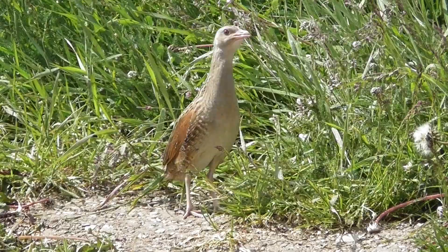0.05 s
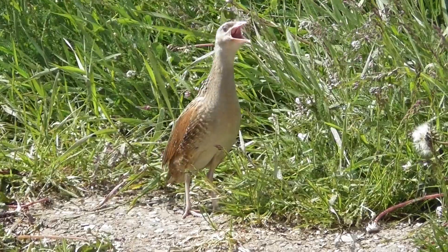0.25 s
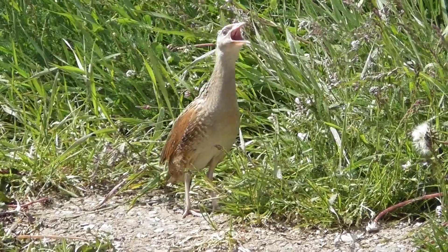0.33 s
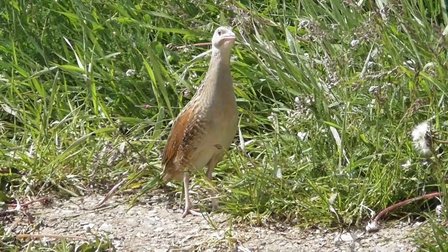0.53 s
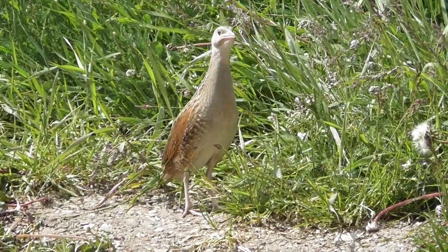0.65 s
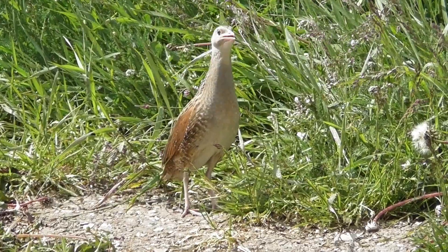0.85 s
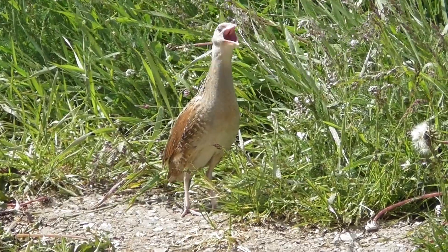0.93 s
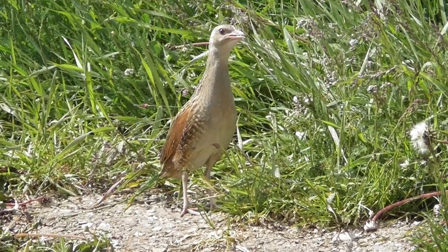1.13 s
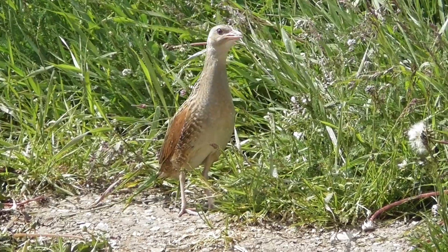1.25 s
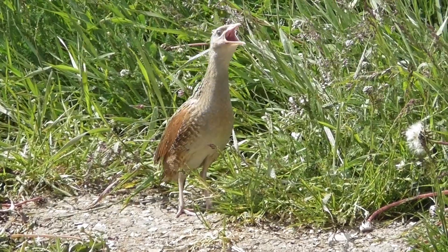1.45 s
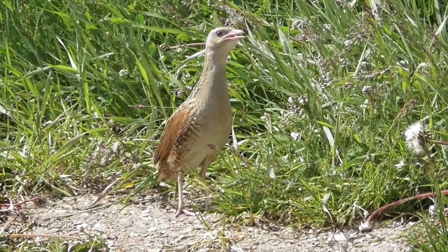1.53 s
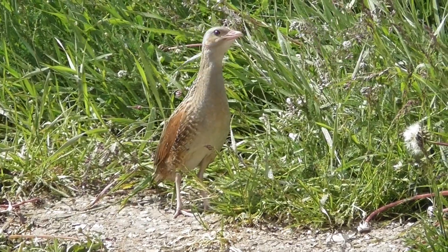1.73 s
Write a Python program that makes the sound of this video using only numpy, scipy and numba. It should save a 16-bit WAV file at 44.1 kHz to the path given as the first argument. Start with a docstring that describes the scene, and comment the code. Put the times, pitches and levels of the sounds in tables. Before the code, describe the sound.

Close by in a meadow, a bird rasps once, pauses, then rasps twice more, each call a brief dry ratcheting buzz with a faint echo. Light wind rumbles on the microphone underneath.

```python
"""A corncrake rasps close by at the edge of a meadow. Each call is a train of dry snaps, grouped
roughly in threes by a slower flutter, that ring the throat and open beak. Grass scatters the sound
and a faint echo returns from afar. Light wind rumbles and pops on the microphone over tiny rustles
and a soft hiss. An automatic volume control turns the sound down a little with each call."""
import sys
import numpy as np
from scipy import signal
from scipy.fft import rfft, irfft
from scipy.io import wavfile
from scipy.ndimage import uniform_filter1d
from numba import njit

SR = 44100
rng = np.random.default_rng(int(sys.argv[2]) if len(sys.argv) > 2 else 0)


def wrap_up_sound(samples):
    """Save the sound to the file named by the first command line argument, as 16-bit audio."""
    columns = np.atleast_2d(samples).T
    # keep every value between -1 and 1, then stretch to whole-number steps
    tamed = np.clip(columns, -1, 1)
    steps = np.round(tamed * 32767).astype(np.int16)
    wavfile.write(sys.argv[1], SR, steps)


N = 79380
LEAD = SR // 2  # extra samples in front, so a call can be under way at time zero
TOTAL = N + LEAD
TIME = (np.arange(TOTAL) - LEAD) / SR
FREQS = np.arange(TOTAL + 1) * SR / (2 * TOTAL) + 1e-6
SNAP_FFT = 2048
SNAP_FREQS = np.arange(SNAP_FFT // 2 + 1) * SR / SNAP_FFT + 1e-6
OPPOSITE_EARS = np.array([[1], [-1]])  # adds a "side" signal on the left, subtracts it on the right

# The calls: start t/s, base snap rate/Hz, snaps per flutter, flutter phase/cycles, level/dB,
# fade/dB (negative swells), beak opening (0-1), treble/dB (before the lift and rise below)
CALLS = [(-.245, 104.3, 3.3, 0.17, -28.5, -30, 0.56, 3), (0.2413, 117, 2.781, 0.2, -22, 0.5, 0.03, -2.5),
         (0.9161, 115.08, 2.814, .170, -23, 2, 0.32, 3), (1.348, 116.68, 2.68, 0.19, -24, 3, 0.79, -1)]
# Number of snaps in each call
SNAPS_PER_CALL = [23, 23, 19, 24]
# Where throat and beak ring: f/Hz, width/Hz, level/dB at opening 0 (half open), level/dB at 1 (wide)
THROAT_RESONANCES = [(1981, 340, -15.5, -14.5), (2443, 335, -7.5, -1.5), (3300, 356, -0.5, 3),
                     (4233, 300, -3.5, 1), (4990, 260, -15, -9), (5736, 192, -14.5, 6), (6364, 482, -2, -6),
                     (6836, 420, 3, 0.5), (7618, 373, -3.5, -1), (8550, 420, -6, -9.5),
                     (9434, 207, -8.5, -10), (10850, 1800, -21, -20.5), (11260, 600, -20.5, -36),
                     (12100, 1000, -23, -35.5), (14300, 1400, -44, -33)]
# Soft low ringing of the body: f/Hz, filter width/Hz, level/dB against the throat, extra fade/dB
BODY_RESONANCES = [(184.5, 115, -25.5, 9.5), (903, 368, -28, 6.5), (1090, 277, -39.5, -18)]
# Tone of the sound scattered by grass: f/Hz, level/dB
GRASS_TONE = [(300, -3), (1500, 3.5), (2400, 1.5), (3400, -3.5), (7000, -4.5), (9000, -2), (15000, -10)]
# Tone of the far echo: f/Hz, level/dB
ECHO_TONE = [(300, 6), (2400, -3), (3200, -5.5), (4300, 3.5), (6500, -2), (9000, -11), (15000, -12)]
# Wind pops: t/s, half-width/s, level/dB, left minus right/dB, rebound (0-1)
WIND_POPS = [(0.4974, 0.00053, -41, -16, .05), (0.5149, .0005, -34.5, -10, 0.12),
             (0.522, 0.00032, -45, -19, 1), (1.3378, 0.00034, -35.5, 7.5, 0.9)]
# Rustles in the grass: t/s, half-length/s, f/Hz, width/Hz, level/dB
GRASS_RUSTLES = [(0.52, 0.0012, 11000, 8000, -52.5), (0.689, 0.00054, 12000, 6000, -55),
                 (0.741, 0.011, 5040, 7000, -67.5), (0.824, 0.0097, 4500, 7060, -65)]
# Gusts on the microphone: t/s, level/dB (before RUMBLE_BOOST_DB is added)
RUMBLE_GUSTS = [(0.0, -62.5), (0.12, -60), (0.184, -49.5), (0.48, -59.5), (0.516, -47), (0.56, -55),
                (0.686, -63.5), (0.786, -50), (0.896, -59), (0.916, -57.5), (1.076, -58.5), (1.092, -65),
                (1.162, -57.5), (1.242, -65.5), (1.352, -49), (1.402, -54), (1.544, -49), (1.8, -66)]
# Tone of the wind rumble: f/Hz, level/dB
RUMBLE_TONE = [(15, -16), (28, -0.5), (70, 1.5), (120, -7), (200, -17.5), (300, -27.5), (800, -64.5)]
# Tone of the meadow's soft rush: f/Hz, level/dB
MEADOW_TONE = [(60, -1), (200, 0.5), (400, -3.5), (750, -5), (1100, -11.5), (1500, -23.5), (2500, -48.5)]
# Tone of the steady hiss: f/Hz, level/dB
HISS_TONE = [(1500, 0), (2300, 6.5), (3000, -2.5), (5000, -4), (7000, 3.5), (10000, 2.5), (15000, 1.5)]

RUSH, RUSH_SNAPS = .324, .39  # the first gap is shorter by this share; the hurry soon dies away
FLUTTER_DEPTH, FLUTTER_LEAD_SNAPS = .277, 3.9
SNAP_SCATTER_DB, FIRST_SNAP_DB, LAST_SNAP_DB = 1.43, -0.5, -2.5
GROUND_ECHO_S, GROUND_ECHO_DB, GROUND_SCATTER = .00092, -3, .12
AIR_DB, AIR_PEAK_S, FIRST_AIR_SHARE, AIR_BUILD_SNAPS = 7.5, 0.0007, 0.55, 4.6
OPENING_LAG, OPENING_SNAPS = 0.33, 3.4  # the beak starts this share less open and catches up
BEND_HZ, BEND_SNAPS = 130, 5.9  # the lowest resonances start flat and rise as the beak opens
THROAT_CUT_HZ, BASS_LAG_S = 2122, 0.000921  # the lowest resonance sounds this late, higher ones sooner
TREBLE_HZ, TREBLE_LIFT_DB, TREBLE_RISE_DB = 9000, 1.25, 0.5  # the treble grows slightly over a call
THRUM_HZ, THRUM_WIDTH_HZ, THRUM_DB = 150, 280, -21  # low thrum, opposite in the two ears
SPRAY_HZ, SPRAY_WIDTH_HZ, SPRAY_DB = 11500, 5000, -21.5  # treble of the air puffs, also opposite
GRASS_DB, GRASS_DECAY_S = -14, 0.067  # time to die away by 60 dB
ECHO_DB, ECHO_DELAY_S, ECHO_SPREAD_S = -38, 0.094, 0.096
RUMBLE_BOOST_DB, MEADOW_DB, MEADOW_GUST_DB, HISS_DB = 6, -62.5, 1.65, -68.5
GAIN_THRESHOLD_DB, GAIN_SLOPE, GAIN_RELEASE_S = -35, 0.21, 0.076
PEAK_DB, TOP_HZ = -9, 15700


def corncrake_call(start, rate, cycle, phase, db, fade_db, opening, treble_db, count):
    """One call as (middle, side): a train of snaps rings the throat and body."""
    times, k = snap_times(start, rate, cycle, phase, count), np.arange(count)
    scatter, thrum_push = rng.standard_normal((count, 2)).T
    ends_db = FIRST_SNAP_DB * (k == 0) + LAST_SNAP_DB * (k == count - 1)
    sizes = undb(-fade_db * (k / count) ** 2 + SNAP_SCATTER_DB * scatter + ends_db)
    bursts, puffs = snaps(count)
    voice = place(times, sizes, throat(bursts, opening))
    treble = shape(voice, 1 / (1 + (TREBLE_HZ / FREQS) ** 8))
    progress = np.clip((TIME - start) * rate / count, 0, 1)
    brightness = undb(treble_db + TREBLE_LIFT_DB + TREBLE_RISE_DB * progress)
    voice = unit(voice + treble * (brightness - 1))
    for hz, width, body_db, extra_fade_db in BODY_RESONANCES:
        knocks = clicks(times, sizes * undb(-extra_fade_db * k / count))
        voice = voice + undb(body_db) * ring(knocks, hz, width)
    thrum = ring(clicks(times, sizes * thrum_push), THRUM_HZ, THRUM_WIDTH_HZ)
    spray = brightness * ring(place(times, sizes, puffs), SPRAY_HZ, SPRAY_WIDTH_HZ)
    side = undb(THRUM_DB) * thrum + undb(SPRAY_DB) * spray
    time_share = count / rate * SR / TOTAL  # makes the level count over the call alone
    return undb(db) * np.sqrt(time_share) * np.array([voice, side])


def snap_times(start, rate, cycle, phase, count):
    """The snaps start in a hurry; a flutter that swells and ebbs bunches them into groups."""
    k = np.arange(count - 1)
    hurry = 1 - RUSH * np.exp(-k / RUSH_SNAPS)
    depth = FLUTTER_DEPTH * np.sin(np.pi * (k + FLUTTER_LEAD_SNAPS) / (count + FLUTTER_LEAD_SNAPS))
    flutter = 1 + depth * np.cos(2 * np.pi * (k / cycle + phase))
    return start + np.r_[0, np.cumsum(hurry * flutter / rate)]


def snaps(count, length=512):
    """One row per snap: a sharp click, two quick fainter echoes off the ground, and a puff of air."""
    k, n = np.arange(count)[:, None], np.arange(length)
    echo_gap = SR * GROUND_ECHO_S * np.exp(GROUND_SCATTER * rng.standard_normal((count, 1)))
    click_and_echoes = sum(undb(j * GROUND_ECHO_DB) * (n == np.round(j * echo_gap)) for j in range(3))
    age = n / SR / AIR_PEAK_S
    puff = age * np.exp(-age)
    build_up = 1 - (1 - FIRST_AIR_SHARE) * np.exp(-k / AIR_BUILD_SNAPS)
    puff = puff / np.linalg.norm(puff) * build_up
    air, side_air = puff * rng.standard_normal((2, count, length))
    return even_out(click_and_echoes + undb(AIR_DB) * air), side_air


def even_out(bursts, evenness=0.64):
    """Make the snaps more alike in tone and equal in energy, without moving their sharp starts."""
    spectrum = rfft(bursts)
    cepstrum = irfft(np.log(np.abs(spectrum) + 1e-9))  # describes each snap's peaks and dips in tone
    half = bursts.shape[1] // 2
    forward_only = np.r_[1, np.full(half - 1, 2), np.zeros(half)]  # no ringing ahead of the snap
    evened = irfft(spectrum * np.exp(-evenness * rfft(cepstrum * forward_only)))
    return evened / np.linalg.norm(evened, axis=1, keepdims=True)


def throat(bursts, opening):
    """Each snap rings the throat and the opening beak; the low notes are cut away steeply."""
    snap = np.arange(len(bursts))[:, None]
    flat_hz = BEND_HZ * np.exp(-snap / BEND_SNAPS)
    opening = opening * (1 - OPENING_LAG * np.exp(-snap / OPENING_SNAPS))
    response = 0
    for k, (hz, width, half_db, wide_db) in enumerate(THROAT_RESONANCES):
        lowness = THROAT_RESONANCES[0][0] / hz
        delay = np.exp(-2j * np.pi * SNAP_FREQS * BASS_LAG_S * lowness)
        gain = (-1) ** k * undb(half_db + opening * (wide_db - half_db))
        response = response + gain * delay * resonance(hz - flat_hz * lowness, width, SNAP_FREQS)
    _, low_cut = signal.freqs(*signal.butter(8, THROAT_CUT_HZ, "high", analog=True), SNAP_FREQS)
    return irfft(rfft(bursts, SNAP_FFT) * response * low_cut)


def reflections(voice):
    """A short scatter from the grass and a blurred echo from far across the field."""
    age = np.arange(TOTAL) / SR
    near = stereo_noise(tone(GRASS_TONE), side=0.38) * np.exp(-np.log(1000) * age / GRASS_DECAY_S)
    echo_swell = np.exp(-((age - ECHO_DELAY_S) / ECHO_SPREAD_S) ** 2 / 2)
    far = stereo_noise(tone(ECHO_TONE), side=0.083) * echo_swell
    response = (undb(GRASS_DB) * unit(near) + undb(ECHO_DB) * unit(far)) / np.sqrt(TOTAL)
    return shape(voice, rfft(response, 2 * TOTAL))


def wind_pops():
    """Brief dips of air pressure at the microphone, some with a rebound."""
    out = 0
    for at, width, db, pan_db, rebound in WIND_POPS:
        age = (TIME - at) / width
        pressure = rebound * np.exp(-(age - 2) ** 2) - np.exp(-age ** 2)
        out = out + undb(db) * pressure * undb(OPPOSITE_EARS * pan_db / 2)
    return out


def grass_rustles():
    """Faint ticks and brushes of grass, each a short swell of high noise."""
    out = 0
    for at, half_length, hz, width, db in GRASS_RUSTLES:
        swell = np.exp(-((TIME - at) / half_length) ** 2)
        out = out + undb(db) * swell * stereo_noise(resonance(hz, width), side=0.19)
    return out


def wind_rumble():
    """Gusts push on the microphone and make a deep rumble."""
    gust_db = np.interp(TIME, *np.array(RUMBLE_GUSTS).T)
    return stereo_noise(tone(RUMBLE_TONE), side=1.53) * undb(RUMBLE_BOOST_DB + gust_db)


def meadow():
    """The soft, wavering rush of the meadow and a faint steady hiss."""
    rush = stereo_noise(tone(MEADOW_TONE), side=0.94)
    rush_db = MEADOW_DB + MEADOW_GUST_DB * wander(rate_hz=11.53)
    hiss = stereo_noise(tone(HISS_TONE), side=0.39)
    return undb(rush_db) * rush + undb(HISS_DB) * hiss


def undb(db):
    """Turn decibels into a factor to multiply by."""
    return 10 ** (np.asarray(db) / 20)


def unit(x):
    """Scale to an average (rms) level of 1."""
    return x / np.sqrt(np.mean(x ** 2))


def shape(x, response):
    """Filter a sound by a gain for each frequency in FREQS."""
    return irfft(rfft(x, 2 * TOTAL) * response)[..., :TOTAL]


def resonance(hz, width_hz, freqs=FREQS):
    """A filter that favours one band, with gain 1 at its centre."""
    return 1 / (1 + 1j * (freqs ** 2 - hz ** 2) / (freqs * width_hz))


def ring(x, hz, width_hz):
    """Pass a sound through the same resonance twice and scale it to level 1."""
    return unit(shape(x, resonance(hz, width_hz) ** 2))


def tone(points):
    """A filter drawn through (f/Hz, level/dB) points."""
    hz, db = np.array(points).T
    return undb(np.interp(np.log(FREQS), np.log(hz), db))


def stereo_noise(response, side):
    """Filtered noise; side sets how much left and right differ."""
    middle, difference = shape(rng.standard_normal((2, TOTAL)), response)
    return unit(middle + side * difference * OPPOSITE_EARS)


def wander(rate_hz):
    """A slow random drift, about 1 in size."""
    hold = int(SR / rate_hz)
    steps = np.repeat(rng.standard_normal(TOTAL // hold + 1), hold)
    return unit(uniform_filter1d(steps, hold)[:TOTAL])


def place(times, sizes, bursts):
    """Lay one burst at each time."""
    index = np.round(times * SR).astype(int)[:, None] + LEAD + np.arange(bursts.shape[1])
    return np.bincount(index.ravel(), (sizes[:, None] * bursts).ravel(), TOTAL)[:TOTAL]


def clicks(times, sizes):
    """Clicks one sample long."""
    return place(times, sizes, np.ones((1, 1)))


@njit
def follow_level(x, release):
    """Track the loudness: quick to rise, slow to fall."""
    out, level = np.empty(len(x)), 0.
    for i in range(len(x)):
        level += (x[i] - level) * (.01 if x[i] > level else release)
        out[i] = level
    return out


def scene():
    """The bird and its reflections among wind and grass."""
    voice, side = sum(corncrake_call(*call, count) for call, count in zip(CALLS, SNAPS_PER_CALL))
    bird = voice + side * OPPOSITE_EARS + reflections(voice)
    return (bird + wind_pops() + grass_rustles() + wind_rumble() + meadow())[:, LEAD:]


def record(dry):
    """A volume control turns loud sound down a little; peaks are rounded and the top treble is cut."""
    loudness = follow_level(np.abs(dry).mean(axis=0), 1 / (GAIN_RELEASE_S * SR))
    turned_down = dry * np.maximum(loudness / undb(GAIN_THRESHOLD_DB), 1) ** -GAIN_SLOPE
    rounded = turned_down / (1 + (turned_down / undb(PEAK_DB)) ** 6) ** (1 / 6)
    return signal.sosfilt(signal.ellip(8, .2, 70, TOP_HZ, fs=SR, output="sos"), rounded)


dry = scene()
out = record(dry)
wrap_up_sound(out)
```